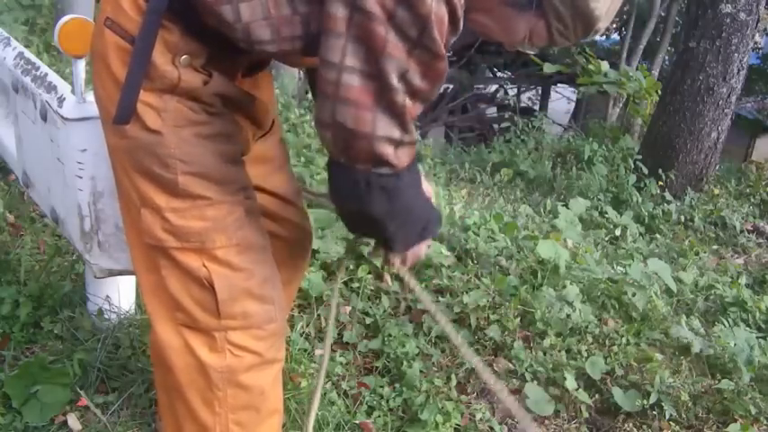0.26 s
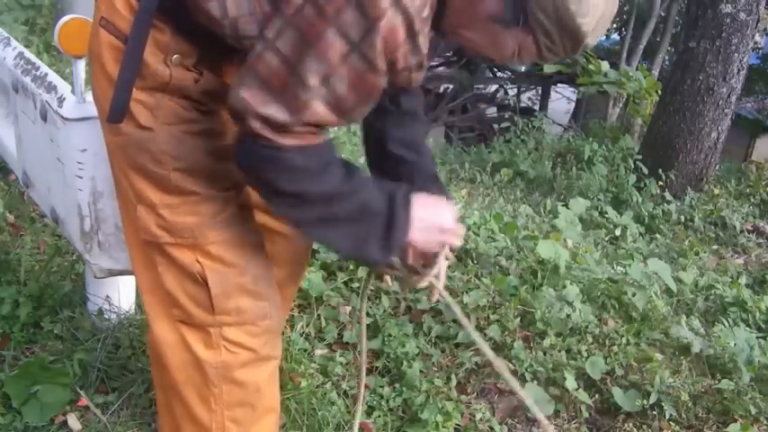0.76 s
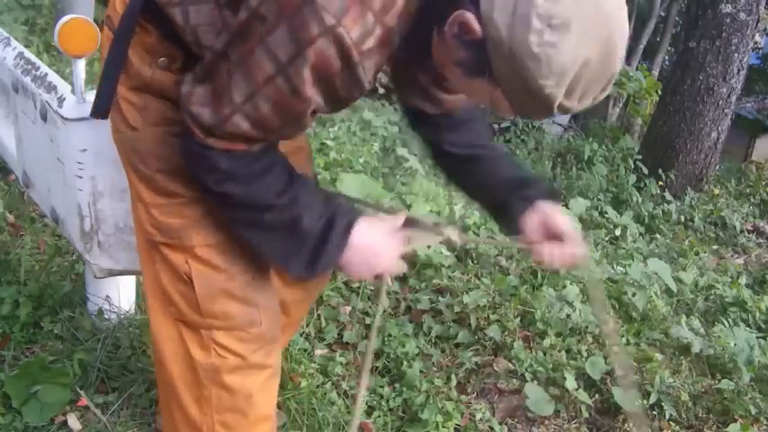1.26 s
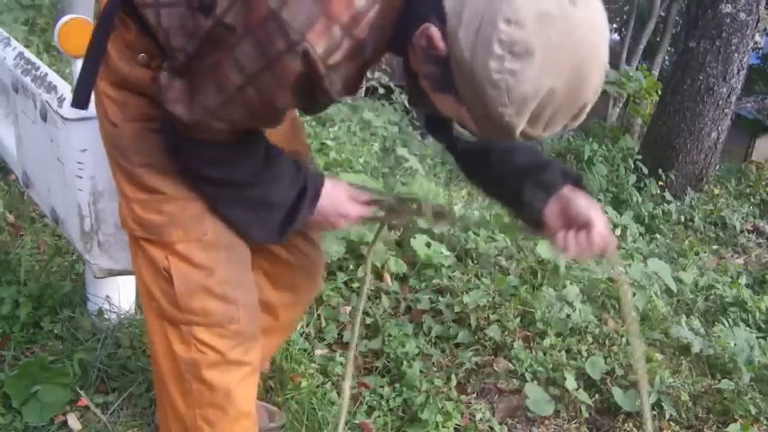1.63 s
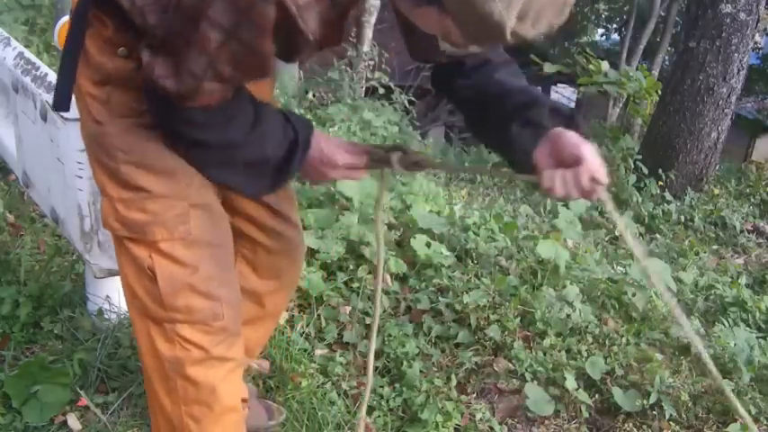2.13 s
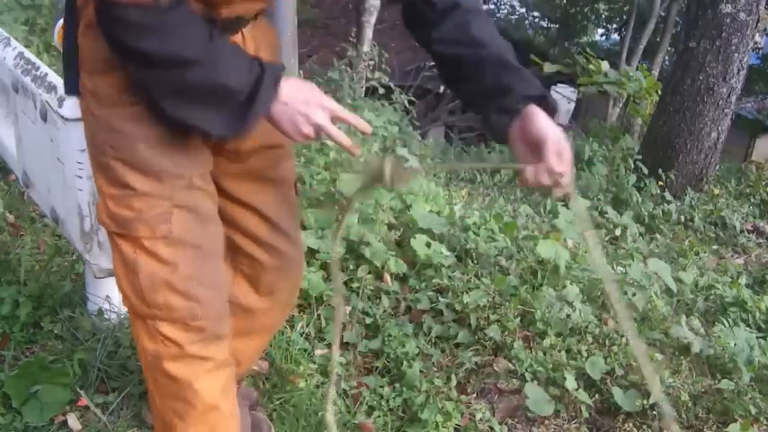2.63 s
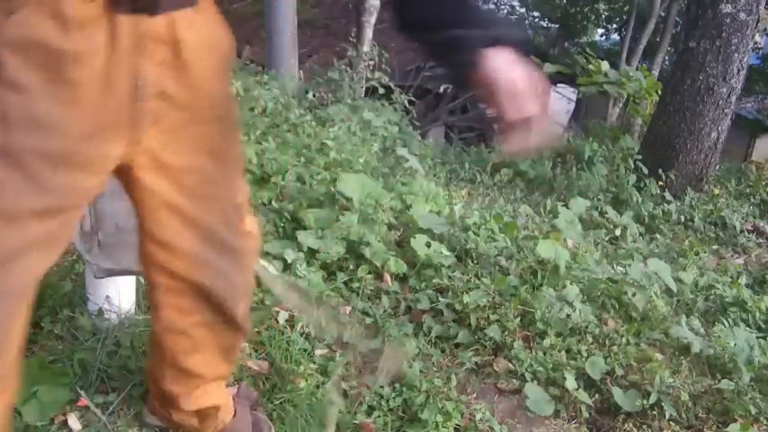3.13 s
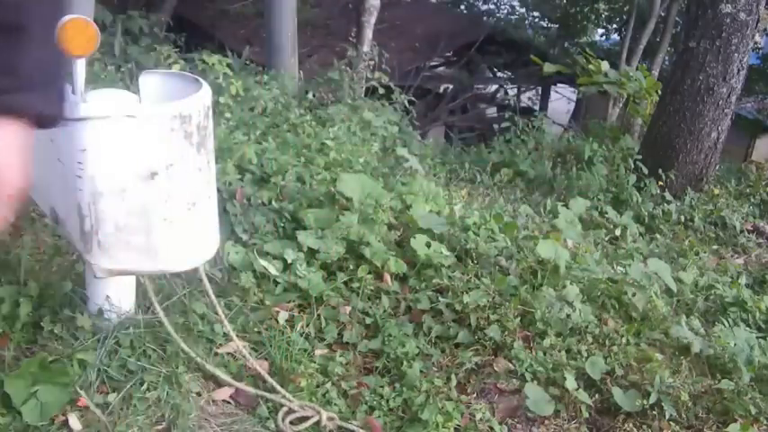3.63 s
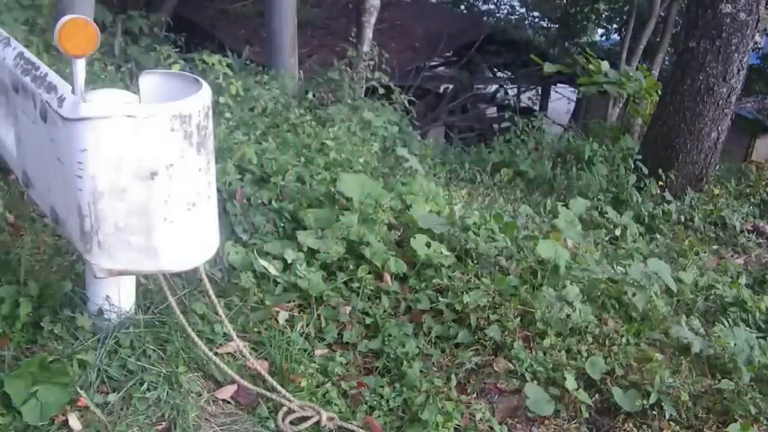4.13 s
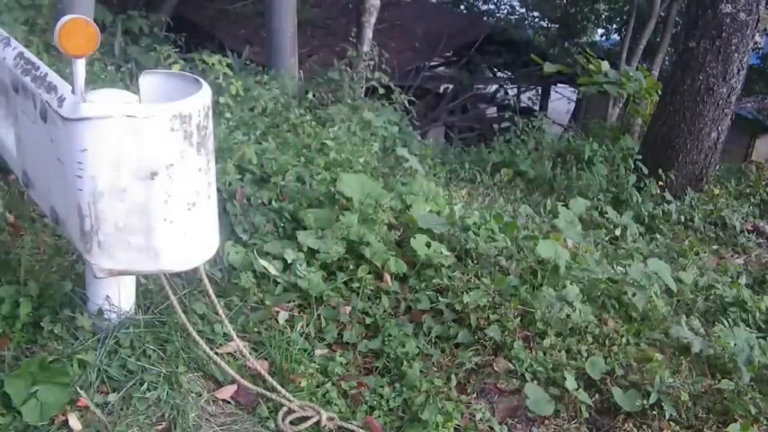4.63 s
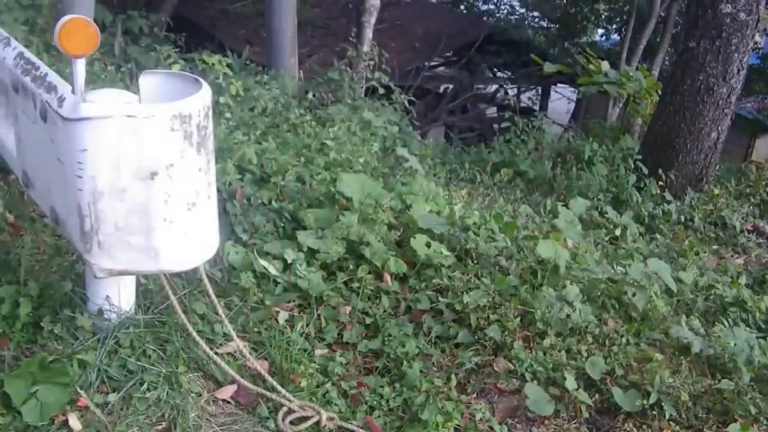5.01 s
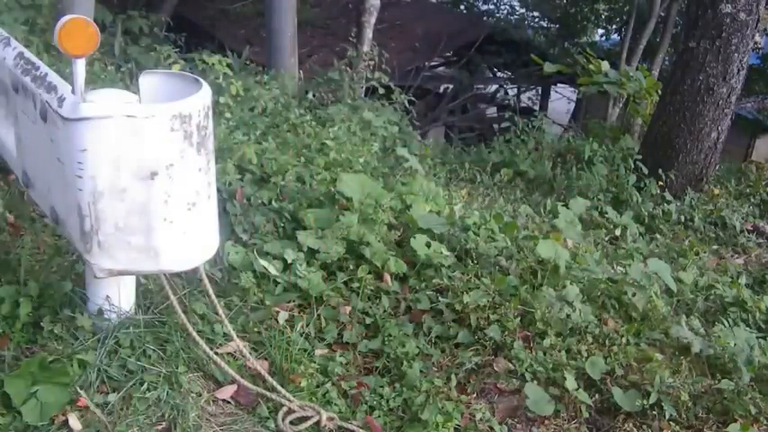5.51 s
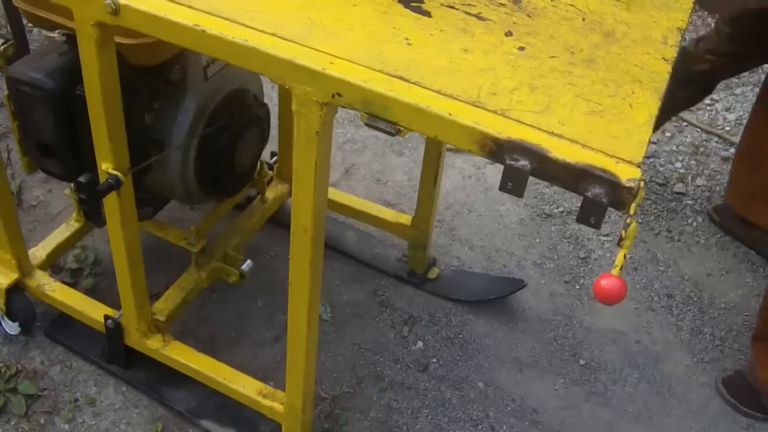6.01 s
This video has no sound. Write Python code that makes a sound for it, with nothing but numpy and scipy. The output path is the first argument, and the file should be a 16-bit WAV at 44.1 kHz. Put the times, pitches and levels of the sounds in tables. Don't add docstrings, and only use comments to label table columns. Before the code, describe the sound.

Outdoors, a small single-cylinder engine idles some metres away, about twelve quick firings a second, its speed hunting slightly, with valve clatter and rattling sheet metal. Midway a boot crunches dry leaves and snaps twigs close to the microphone, and the engine dips in level before creeping back. Soft thuds follow. A short silence, then the engine resumes close up with a loose metal slap.

```python
import sys
import numpy as np
from scipy import signal
from scipy.fft import rfft, irfft, next_fast_len
from scipy.io import wavfile
from scipy.ndimage import uniform_filter1d

SR = 44100
rng = np.random.default_rng(int(sys.argv[2]) if len(sys.argv) > 2 else 0)


def pcm_store(signal):
    levels = np.round(np.clip(np.atleast_2d(signal), -1, 1) * 32767)
    wavfile.write(sys.argv[1], SR, levels.astype(np.int16).T)


def invert_db(x):
    u = np.asarray(x, float) / 20
    return 10 ** u


N = 276066
T = np.arange(N) / SR
IDLE_PER_S = 12


def evened(x):
    return x / np.sqrt(np.mean(x ** 2) + 1e-20)


def add(mix, s, sound):
    part = mix[round(s * SR):][:len(sound)]
    part += sound[:len(part)]


def coloured(x, points):
    size = next_fast_len(len(x))
    hz, db = np.transpose(points)
    f = np.fft.rfftfreq(size, 1 / SR) + 1
    gain = invert_db(np.interp(np.log(f), np.log(hz), db, left=-90, right=-90))
    return irfft(rfft(x, size) * gain, size)[:len(x)]


def rung(x, modes):
    t = np.arange(6000) / SR
    ring = np.zeros(len(t))
    for k, (hz, width_hz, db) in enumerate(modes):
        swell_and_die = t * np.exp(-4.9 * width_hz * t)
        level = (-1) ** k * invert_db(db) * width_hz ** 1.5
        ring += level * swell_and_die * np.sin(2 * np.pi * hz * t)
    return signal.oaconvolve(x, ring / np.linalg.norm(ring))[:len(x)]


def knocks(per_s, spread_db):
    chance, size, sign = rng.random((3, N))
    blow = invert_db(-spread_db * np.log(1 - .99 * size))
    return evened((chance < per_s / SR) * blow * np.sign(sign - .5))


# time in seconds, firings per second.
SPEED = [(0, 11.485), (.62, 12.211), (.63, 11.819), (1.08, 12.94), (1.48, 11.483), (1.65, 11.172),
         (1.84, 12.717), (2.47, 11.401), (2.75, 12.028), (2.95, 12.68), (3.51, 10.792), (3.76, 12.855),
         (4.32, 11.57), (4.37, 10.763), (4.74, 12.21), (5.09, 11.876), (5.5, 11.73)]


def speed(t):
    return np.interp(t, *np.transpose(SPEED))


# exhaust pop, valve clatter, shroud shake, frame shake, all in dB.
EFFORT_DB = (1.2, 1.2, .6, 1.0)
SPREAD_DB = (2.2, .8, 1.3, 1.1)


def far_firings():
    t = T - .051
    s = np.interp(np.arange(67), np.cumsum(speed(t)) / SR, t)
    extra = speed(s)[:, None] - IDLE_PER_S
    chance = rng.standard_normal((len(s), 4)) * SPREAD_DB
    return np.c_[s, extra * EFFORT_DB + chance]


def burst(firings, column, shape):
    delay, rise, hold, fall, level_db, per_s = shape
    last = np.clip(np.searchsorted(firings[:, 0] + delay, T) - 1, 0, None)
    since = np.maximum(T - firings[last, 0] - delay, 0)
    swell = (1 - np.exp(-since / rise)) * np.exp(-np.maximum(since - hold, 0) / fall)
    return invert_db(level_db + firings[last, column]) * swell * knocks(per_s, spread_db=3.0)


def pops(firings, level_db, width, pipe):
    u = (np.arange(800) / SR - 5 * width) / width
    pulse = (u + .6) * np.exp(-u ** 2 / 2)
    out = np.zeros(N)
    for s, db, *_ in firings[1:]:
        for delay, echo_db in pipe:
            add(out, s + delay - 6 * width, invert_db(level_db + db + echo_db) * pulse)
    return out


def engine(firings, drone, drone_db, hum_db, frame, shroud, head, puff, bursts):
    uneven = evened(uniform_filter1d(uniform_filter1d(rng.standard_normal(N), 900), 900))
    rattle = .9 * rng.standard_normal(N) + .4 * knocks(2500, spread_db=2.5)
    steady = invert_db(.9 * uneven) * rattle
    out = invert_db(drone_db) * evened(coloured(steady, drone))
    out += rung(burst(firings, 4, bursts["frame"]) + invert_db(hum_db[0]) * steady, frame)
    out += rung(burst(firings, 3, bursts["shroud"]) + invert_db(hum_db[1]) * steady, shroud)
    out += rung(burst(firings, 2, bursts["head"]), head)
    gas = burst(firings, 2, bursts["puff"]) + burst(firings, 2, bursts["suck"])
    return out + coloured(gas, puff)


# pitch in Hz, level in dB per Hz.
FAR_DRONE = [(25, -38), (60, -31), (240, -29.5), (330, -23), (380, -24), (440, -14), (950, -14),
             (1240, -25), (1400, -14), (1750, -12), (1900, -14), (3500, -15), (3850, -20), (4500, -14),
             (6000, -30), (10000, -35), (11500, -46.5), (15500, -53.5)]
FAR_HUM_DB = (-34.5, -31)
# pitch in Hz, width in Hz, level in dB.
FAR_FRAME = [(452, 16, 0), (482, 25, -4), (535, 26, -2), (621, 24, 0), (690, 40, -2), (760, 70, -5),
             (842, 18, 0), (1125, 26, -8)]
FAR_SHROUD = [(1415, 35, -5), (1454, 24, -2), (1560, 70, -2), (1621, 30, 1), (1698, 45, -3),
              (1888, 50, -12), (2177, 60, -11), (2301, 40, -13), (2767, 90, -12), (2966, 35, -11),
              (3478, 45, -12), (3539, 45, -11)]
FAR_HEAD = [(4086, 200, -2), (4398, 100, -1), (4635, 200, -2), (5080, 350, -5), (6450, 400, -11),
            (7600, 300, -11), (8200, 350, -10), (9500, 1200, -15)]
# pitch in Hz, level in dB per Hz.
FAR_PUFF = [(2000, -7), (5000, -2), (6000, -12), (6600, -7), (8200, -4), (10300, -9), (11300, -24),
            (15500, -30)]
FAR_BURSTS = {"frame": (.0, .008, .03, .03, -32, 1200), "shroud": (-.008, .012, .04, .025, -25.8, 1200),
              "head": (.014, .003, .018, .022, -28.3, 5000), "puff": (.014, .003, .022, .025, -30, 12000),
              "suck": (.042, .004, .01, .02, -37, 9000)}
# delay in seconds, level in dB.
FAR_PIPE = [(0, 0), (.0105, -8), (.022, -7), (.031, -12)]


def far_engine():
    firings = far_firings()
    drone_db = -25.2 + .9 * (speed(T) - IDLE_PER_S)
    body = engine(firings, FAR_DRONE, drone_db, FAR_HUM_DB, FAR_FRAME, FAR_SHROUD, FAR_HEAD,
                  FAR_PUFF, FAR_BURSTS)
    return body + pops(firings, level_db=-34.5, width=.0008, pipe=FAR_PIPE)


# start in seconds, level in dB, pitch in Hz, seconds to fade by 60 dB.
THUMPS = [
    (4.005, -26, 33, .4),
    (4.1, -31, 35, .35),
    (4.56, -40, 33, .9),
]


def rumble():
    out = invert_db(-59) * evened(rung(rng.standard_normal(N), [(34, 22, 0)]))
    t = np.arange(SR // 2) / SR
    for s, db, hz, t60 in THUMPS:
        fade = invert_db(db - 60 * t / t60) * (1 - np.exp(-t / .02))
        add(out, s, -fade * np.sin(2 * np.pi * hz * t))
    return out


def yard(x, t60, wet_db):
    t = np.arange(int(.4 * SR)) / SR
    echoes = (rng.random(len(t)) < 2000 / SR) * rng.standard_normal(len(t))
    tail = echoes * invert_db(-60 * t / t60) * (t > .004)
    return x + invert_db(wet_db) * signal.oaconvolve(x, tail / np.linalg.norm(tail))[:N]


# start in seconds, hold in seconds, rustle in dB, rise and fall in dB per second.
STEPS = [
    (3.15, .07, -31.5, 500, 100),
    (3.28, .065, -17, 230, 500),
    (3.375, .06, -23.5, 400, 65),
    (3.9, .045, -32, 480, 60),
    (4.36, .04, -39, 200, 100),
]
# pitch in Hz, level in dB per Hz.
LEAVES = [(1200, -18), (2600, -10), (4400, 0), (5800, 0), (7200, -6), (8500, -10), (10000, -9),
          (11500, -17), (15500, -23)]


def leaves():
    levels = []
    for s, hold, db, rise, fall in STEPS:
        levels.append(db - rise * np.maximum(s - T, 0) - fall * np.maximum(T - s - hold, 0))
    level_db = np.max(levels, axis=0)
    per_s = np.maximum(4500 * invert_db(.5 * (level_db + 16)), 1500)
    crackle = knocks(per_s, spread_db=4.0) / np.sqrt(per_s / 600)
    return invert_db(level_db) * evened(coloured(crackle + .5 * rng.standard_normal(N), LEAVES))


# start in seconds, peak in dB, pitch in Hz, brightness in dB.
SNAPS = [(3.1534, -17, 4520, -21), (3.1834, -14, 4610, -21), (3.2474, -11, 4600, -17),
         (3.275, -2, 4960, -23), (3.2804, -7, 4650, -16), (3.2874, -2, 5200, -18), (3.2944, -2, 5740, -18),
         (3.3004, -4, 5390, -21), (3.3154, -7, 4610, -17), (3.3234, -9, 4650, -17), (3.3314, -2, 4720, -24),
         (3.4077, -7.5, 4680, -14), (3.4281, -20, 4210, -21), (3.4414, -18, 4740, -16),
         (3.4684, -16, 4370, -25), (3.4745, -14, 4460, -24), (3.9054, -16, 4600, -17),
         (3.9354, -22, 4470, -18)]


def twigs():
    out = np.zeros(N)
    t = np.arange(200) / SR
    fold = t / .0003 * np.exp(1 - t / .0003)
    for s, db, hz, bright_db in SNAPS:
        grit = rng.standard_normal(len(t))
        low = np.sin(2 * np.pi * hz * t) * fold
        high = (np.sin(2 * np.pi * 9800 * t) + .55 * grit) * fold
        add(out, s + .0005, .7 * invert_db(db - duck_db(s)) * (low + invert_db(bright_db + 9) * high))
    return out


def duck_db(s):
    since = np.asarray(s) - 3.25
    fall = np.sin(np.pi / 2 * np.clip(since / .13, 0, 1)) ** 2
    return -12 * fall * np.exp(-np.maximum(since - .3, 0) / .36)


# start in seconds, strength in dB, shroud slap before, with and after it in dB.
NEAR_FIRINGS = [
    (5.645, 0, -30, -30, -30),
    (5.7295, .5, -14, -25, -16),
    (5.818, .8, -25, -15, -11),
    (5.909, -1.2, -18, -25, -13),
    (6.002, -.3, -13, -12, -20),
    (6.0885, .4, -6.5, -15, -11),
    (6.178, 1.5, -11, -14, -20),
    (6.2655, 0, -9, -30, -30),
]
SLAP_DELAYS_S = (-.0145, .0042, .0242)


def slaps():
    hits = np.zeros(N)
    for s, _, *levels in NEAR_FIRINGS:
        for delay, db in zip(SLAP_DELAYS_S, levels):
            add(hits, s + delay, invert_db([db + 16]))
    return rung(hits, [(1520, 200, 0), (1720, 200, -2), (3400, 700, -12), (4800, 600, -12)])


# pitch in Hz, level in dB per Hz.
NEAR_DRONE = [(40, -50), (110, -43), (260, -42), (320, -30), (400, -30), (520, -15), (1000, -16),
              (1220, -21), (1400, -12), (1750, -10), (1900, -12.5), (3600, -14), (5200, -13), (5900, -28),
              (10000, -39), (15500, -57)]
NEAR_HUM_DB = (-41, -27.5)
# pitch in Hz, width in Hz, level in dB.
NEAR_FRAME = [(452, 20, -3), (600, 90, -4), (694, 40, -1), (850, 90, -4), (970, 80, -4)]
NEAR_SHROUD = [(1290, 30, -11), (1448, 30, -1), (1577, 50, 0), (1723, 60, -2), (2762, 60, -10),
               (2977, 60, -9), (3338, 50, -8), (3580, 60, -8)]
NEAR_HEAD = [(4118, 200, -2), (4495, 200, -2), (4850, 300, 0), (6223, 300, -5), (6761, 300, -6),
             (7698, 300, -9), (8200, 400, -8), (9800, 1500, -8)]
# pitch in Hz, level in dB per Hz.
NEAR_PUFF = [(1800, -5), (3500, -2), (5200, 2), (5900, -8), (6700, -5), (10500, -9), (12300, -16),
             (14000, -15), (15500, -24)]
NEAR_BURSTS = {"frame": (.0, .004, .025, .02, -33, 600), "shroud": (.0, .004, .03, .015, -23, 600),
               "head": (.021, .003, .007, .011, -20, 3500), "puff": (-.001, .003, .009, .007, -16, 3500),
               "suck": (.021, .002, .007, .012, -18, 3500)}
# delay in seconds, level in dB.
NEAR_PIPE = [(.005, 0), (.016, -8), (.027, -5)]


def near_engine():
    firings = np.array(NEAR_FIRINGS)[:, [0, 1, 1, 1, 1]]
    body = engine(firings, NEAR_DRONE, -23.5, NEAR_HUM_DB, NEAR_FRAME, NEAR_SHROUD, NEAR_HEAD,
                  NEAR_PUFF, NEAR_BURSTS)
    echoing = yard(body + slaps(), t60=.1, wet_db=-14)
    return echoing + pops(firings[:-1], level_db=-41.5, width=.0018, pipe=NEAR_PIPE)


CUT_S = (5.5395, 5.7095)


def scene():
    boot = yard(leaves() + twigs(), t60=.04, wet_db=-16)
    far = far_engine() + boot + rumble()
    near = near_engine() + invert_db(-6) * rumble()
    return np.tile(np.where(T < CUT_S[0], far, near), (2, 1))


def top_cut(x):
    return signal.sosfilt(signal.butter(12, 16480, fs=SR, output="sos"), x)


def record(dry):
    x = dry * invert_db(duck_db(T))
    x = signal.lfilter(*signal.butter(1, 12, "high", fs=SR), x)
    for hz in (7415, 2 * 7415):
        x = signal.lfilter(*signal.iirnotch(hz, hz / 90, SR), x)
    outside = np.maximum(CUT_S[0] - T, (T - CUT_S[1]) / 2)
    x = x * np.clip(outside / .0015, 0, 1) ** 2
    band_limit = signal.firwin(401, 15750, window=("kaiser", 8), fs=SR)
    x = signal.oaconvolve(x, band_limit[None], "same")
    return top_cut(x)


dry = scene()
out = record(dry)
pcm_store(out)
```